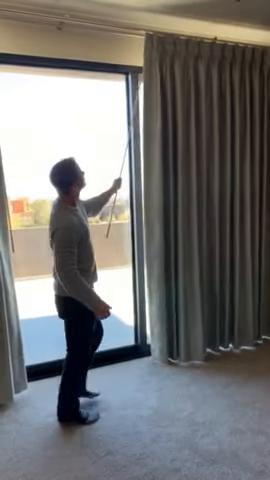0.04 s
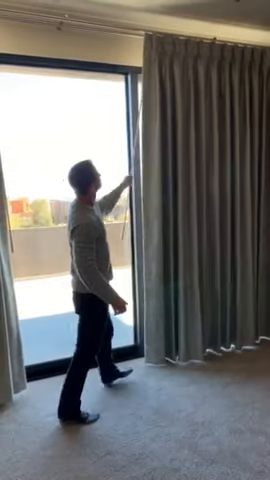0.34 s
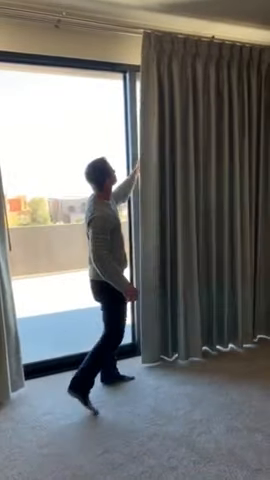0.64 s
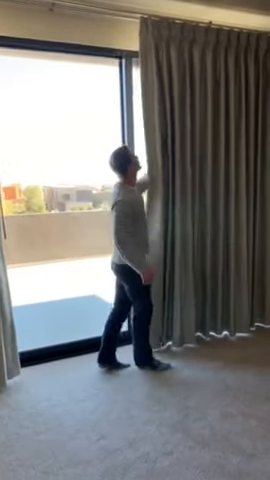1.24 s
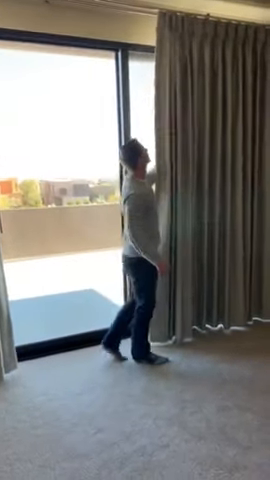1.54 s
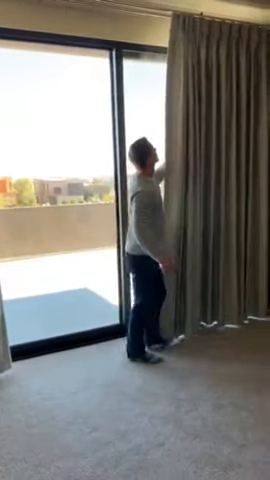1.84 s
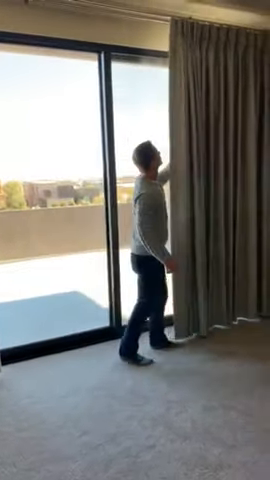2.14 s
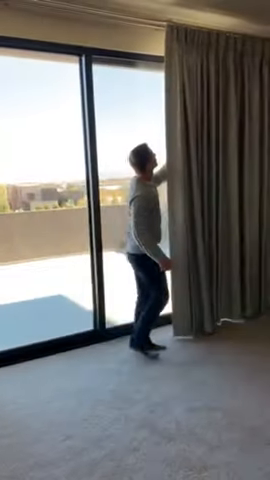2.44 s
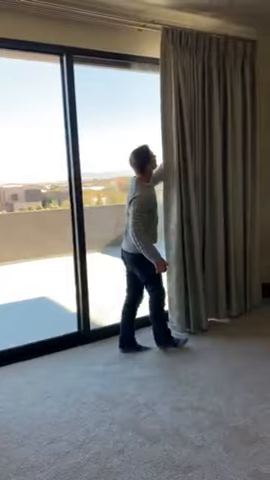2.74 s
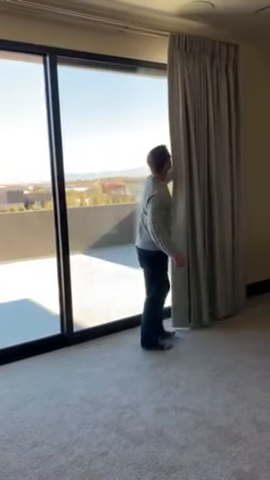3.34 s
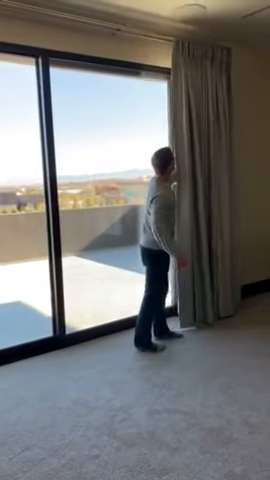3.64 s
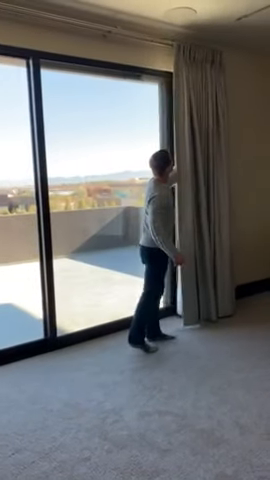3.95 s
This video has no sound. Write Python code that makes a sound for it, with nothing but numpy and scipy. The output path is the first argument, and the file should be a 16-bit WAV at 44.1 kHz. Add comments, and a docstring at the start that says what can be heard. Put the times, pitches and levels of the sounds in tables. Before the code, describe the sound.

A heavy drape slides open in a quiet room, heard from a few metres off. Faint footsteps come first, then a sharp tug rattles the rail, and the runners rub and rumble along while hooks chink and folds rustle.

```python
"""Drawing a heavy drape

A few metres away in a carpeted room, soft steps and the taps of a pull wand sound over a low hum.
The cloth stirs, then a tug shakes the ceiling track and the gliders (the little runners that carry
the drape) break loose with a rush. They slow down, then rub along steadily while the track rumbles.
Metal hooks chink, and the folds rustle as they gather."""
import sys
import numpy as np
from scipy import signal
from scipy.fft import rfft, irfft, next_fast_len
from scipy.io import wavfile
from scipy.ndimage import uniform_filter1d

SR = 44100
rng = np.random.default_rng(int(sys.argv[2]) if len(sys.argv) > 2 else 0)


def transcribe(u):
    """Save the signal u as a 16-bit wav file named by the first command-line argument.

    u: samples, shape (n,) or (channels, n), limited to [-1, 1]; the rate is SR.
    q: integer samples, one column per channel.
    """
    v = np.clip(np.atleast_2d(u).T, -1, 1)
    q = np.round(v * 32767).astype(np.int16)
    wavfile.write(sys.argv[1], SR, q)


N = 176400
TIME = np.arange(N) / SR

SLIPS_PER_S, SLIP_SPREAD_DB = 5000, 3
FIBRES_PER_S, FIBRE_SPREAD_DB = 20000, 2

# How loudly the gliders rub in the track. Each row: time in seconds, level in dB.
GLIDER_LEVEL = [(1.0, -100), (1.4, -72), (1.5, -56), (1.55, -42.5), (1.61, -41.5), (1.66, -48), (1.76, -54),
                (2.05, -63), (2.2, -57), (2.38, -53), (2.62, -53), (2.75, -50), (3.15, -50), (3.27, -52.5),
                (3.36, -49.5), (3.75, -49.5), (4, -50)]
# Their tone colour (how strong the lows and highs are). Each row: frequency in Hz, level in dB.
GLIDER_COLOUR = [(100, -10), (300, 0), (650, 1), (1100, -2), (2000, 0), (2700, 1), (4300, -2), (5600, -6),
                 (7600, -7), (9500, -12), (12500, -19), (15500, -26)]


def from_db(db):
    """Turn decibels into a number to multiply a sound by."""
    return 10 ** (np.asarray(db) / 20)


def rms_one(x):
    """Scale a signal so that its average strength (rms) is 1."""
    return x / np.sqrt(np.mean(x ** 2) + 1e-20)


def in_time(rows):
    """Join rows of seconds and dB into a volume curve."""
    return from_db(np.interp(TIME, *np.transpose(rows)))


def at_hz(points, hz):
    """Read between rows of Hz and dB, giving every octave the same space."""
    frequencies, levels = np.transpose(points)
    return np.interp(np.log(np.maximum(hz, 1)), np.log(frequencies), levels)


def coloured(x, colour):
    """Give a sound a tone colour; the result has strength 1."""
    gains = from_db(at_hz(colour, np.fft.rfftfreq(N, 1 / SR)))
    return rms_one(irfft(rfft(x) * gains, N))


def flutter(depth_db, rate_hz=45):
    """A volume curve that wavers at random, like an uneven sliding contact."""
    lowpass = signal.butter(2, rate_hz, fs=SR, output="sos")
    wobble = rms_one(signal.sosfilt(lowpass, rng.standard_normal(N)))
    return rms_one(from_db(depth_db * wobble))


def grains(per_s, spread_db):
    """Tiny impacts of uneven size at random moments."""
    sizes = from_db(spread_db * np.minimum(rng.exponential(1, N), 5))
    signs = rng.choice([-1, 1], N)
    return sizes * signs * (rng.random(N) < per_s / SR) + 1e-18


def resonate(x, modes):
    """Make a sound ring at an object's own notes (modes); narrow ones ring longer."""
    out = 0
    for k, (hz, width, db) in enumerate(modes):
        radius = np.exp(-np.pi * width / SR)
        angle = 2 * np.pi * min(hz / SR, .45)
        ring = signal.lfilter([1, 0, -1], [1, -2 * radius * np.cos(angle), radius * radius], x)
        out = out + (-1) ** k * from_db(db) * rms_one(ring)
    return rms_one(out)


def bursts(hits, decay_s):
    """A volume curve that jumps up at each hit and dies away."""
    return sum(from_db(db) * (TIME > s) * np.exp(-np.clip((TIME - s) / decay_s, 0, 20)) for s, db in hits)


def room_tone():
    """Ventilation makes a low rush of air, and the mains supply hums."""
    # Colour of the air noise. Each row: frequency in Hz, level in dB.
    colour = [(20, -44), (40, -5), (58, 8), (100, -6.5), (170, -11), (300, -22.5), (600, -31.5),
              (1500, -29), (3000, -34.5), (5000, -38), (10000, -34.5), (15500, -41.5)]
    air_db, hum_db, hum_hz = -65.5, -81.5, 63
    air = from_db(air_db) * coloured(rng.standard_normal(N), colour)
    return air + from_db(hum_db) * np.sqrt(2) * np.sin(2 * np.pi * hum_hz * TIME)


def steps():
    """A shoe lands with a dull thud and brushes the carpet."""
    # Steps and shuffles. Each row: start in seconds, thud in dB, scuff in dB, length in seconds.
    footfalls = [(.0, -78, -74.5, 0.035), (0.457, -73.5, -79, 0.065), (0.659, -74, -75.5, 0.091),
                 (0.895, -73, -74.5, 0.03), (1.188, -53, -58.5, 0.011), (1.233, -61.5, -91, 0.012)]
    # Colours of the thud and the scuff. Each row: frequency in Hz, level in dB.
    thud_colour = [(30, -18), (70, 3), (130, -1), (205, 9), (330, -2.5), (500, -16), (800, -16),
                   (1400, -34), (8000, -39)]
    scuff_colour = [(200, 10), (800, 4), (1500, 3.5), (2900, 3), (5000, -9), (7700, -6.5), (9500, -21),
                    (15000, -34)]
    attack_s, decay_s = 0.00056, 0.034
    thud = coloured(rng.standard_normal(N), thud_colour)
    scuff = coloured(rng.standard_normal(N), scuff_colour)
    out = 0
    for start, thud_db, scuff_db, length in footfalls:
        rise = np.clip((TIME - start) / attack_s, 0, 1)
        fall = np.exp(-np.clip((TIME - start - length) / decay_s, 0, 20))
        out = out + rise * fall * (from_db(thud_db) * thud + from_db(scuff_db) * scuff)
    return out


def wand():
    """The pull wand taps the top of the drape, and the rod rattles briefly."""
    # The taps. Each row: start in seconds, level in dB.
    taps = [(0.661, -67), (0.69, -73), (0.735, -80), (1.194, -54.5)]
    # The rod's notes. Each row: pitch in Hz, width in Hz, level in dB.
    modes = [(820, 110, -11), (1510, 400, -11), (2270, 340, 1), (2925, 82, 2), (3400, 200, -5),
             (4110, 260, -1.5), (6000, 500, -7), (7500, 690, -5)]
    return bursts(taps, decay_s=0.018) * resonate(rng.standard_normal(N), modes)


def cloth():
    """Countless fibres rub as the folds slide over each other."""
    # Loudness of the rubbing. Each row: time in seconds, level in dB.
    level = [(0, -100), (.97, -80.5), (1.15, -64), (1.21, -64.5), (1.28, -64), (1.42, -56), (1.52, -49.5),
             (1.6, -63), (1.72, -50.5), (1.88, -51.5), (2.07, -55), (2.18, -50), (2.4, -48.5), (2.8, -49),
             (3.3, -52), (3.8, -50), (4, -51)]
    # Its colour. Each row: frequency in Hz, level in dB.
    colour = [(150, -24), (500, -0.5), (1200, -0.5), (2000, 2), (2800, 1), (4200, 2.5), (5300, -7),
              (7700, -4.5), (9000, -27), (15000, -76)]
    return in_time(level) * flutter(depth_db=1.8) * coloured(grains(FIBRES_PER_S, FIBRE_SPREAD_DB), colour)


def carrier():
    """The lead carrier, which pulls the drape, takes up the load in hollow, ringing knocks."""
    # The knocks. Each row: start in seconds, level in dB, pitch in Hz, decay in seconds.
    knocks = [(1.191, -53, 800, .007), (1.528, -49, 575, .025), (1.572, -42, 932, .02),
              (1.59, -44, 568, .05)]
    attack_s = 0.0098
    out = 0
    for start, db, hz, decay_s in knocks:
        age = np.clip(TIME - start, 0, 1)
        shape = 2 * (1 - np.exp(-age / attack_s)) * np.exp(-age / decay_s)
        out = out + from_db(db) * shape * np.sin(2 * np.pi * hz * age)
    return out


def clatter():
    """The wand's rod gives one sharp tick, then gliders clack together as the slack is taken up; each clack is
    a spray of tiny hard contacts."""
    # The clacks. Each row: start in seconds, level in dB.
    clacks = [(1.194, -61), (1.521, -49), (1.535, -48), (1.556, -41), (1.587, -42)]
    # Their colour. Each row: frequency in Hz, level in dB.
    colour = [(1000, -12), (3000, -1), (5500, -1), (7500, -2), (10000, -5), (12500, -13), (15000, -10)]
    return bursts(clacks, decay_s=.014) * coloured(grains(SLIPS_PER_S, SLIP_SPREAD_DB), colour)


def track():
    """The drape's weight bumps along and shakes track and ceiling, harder where a glider catches."""
    # Loudness of the rumble. Each row: time in seconds, level in dB.
    level = [(0, -110), (1.0, -80.5), (1.38, -77), (1.46, -59.5), (1.51, -44), (1.62, -48.5), (1.75, -49.5),
             (1.9, -50), (2.06, -57.5), (2.17, -52.5), (2.32, -52.5), (2.45, -49.5), (2.8, -56.5),
             (3.25, -53), (3.7, -53.5), (4, -52)]
    # Low notes of track and ceiling. Each row: pitch in Hz, width in Hz, level in dB.
    modes = [(72.3, 12, -9.5), (129, 18, -10.5), (178.4, 17.7, -2), (209.6, 13, 3.5), (228, 29, -2),
             (265, 16, -3.5), (305.7, 10, -9), (352, 9.5, -4.5), (397, 16, -10.5), (448, 15, -10.5),
             (585, 16, -16)]
    # Moments when a glider catches. Each row: time in seconds, extra rumble in dB.
    catches = [(1.772, 4), (1.842, 4), (1.974, 5), (2.155, 4), (3.099, 4), (3.70, 4)]
    catch_width_s, cutoff_hz = .016, 900
    shake = resonate(grains(per_s=830, spread_db=-1.5), modes)
    shake = signal.sosfilt(signal.butter(2, cutoff_hz, fs=SR, output="sos"), shake)
    even_shake = shake / np.sqrt(uniform_filter1d(shake ** 2, size=3000) + 1e-9)
    thumps_db = sum(db * np.exp(-((TIME - s) / catch_width_s) ** 2) for s, db in catches)
    return in_time(level) * from_db(thumps_db) * even_shake


def judder():
    """The tugged track shudders in one rough, low note that sags as the drape starts to move."""
    # The path of the note. Each row: time in seconds, level in dB, pitch in Hz.
    note = [(1.41, -75, 215), (1.475, -57, 215), (1.505, -44.5, 200), (1.53, -46, 198), (1.565, -42, 203),
            (1.61, -46, 188), (1.64, -41, 178), (1.67, -48, 182), (1.70, -43.5, 186), (1.75, -59, 195),
            (1.85, -100, 200)]
    times, db, hz = np.transpose(note)
    phase = 2 * np.pi * np.cumsum(np.interp(TIME, times, hz)) / SR
    volume = from_db(np.interp(TIME, times, db)) * (TIME > times[0])
    return volume * flutter(depth_db=2.5) * np.sqrt(2) * np.sin(phase)


def hooks():
    """Each chink is a few milliseconds of metal chattering on metal, then a faint loose rattle."""
    # The chinks. Each row: start in seconds, level in dB, length in seconds, pitch in Hz.
    chinks = [(1.446, -60.5, .008, 11500), (1.499, -40.5, 0.0024, 10480), (1.522, -52, 0.007, 7500),
              (1.553, -40, 0.007, 7800), (1.586, -42, 0.0046, 7700), (2.33, -44, .006, 7350),
              (2.3543, -43, 0.01, 7850), (2.362, -37, 0.0045, 7600), (2.361, -45, .007, 14650),
              (2.378, -46.5, .009, 11930), (2.422, -47, .005, 7800), (2.4555, -44, 0.0058, 7600),
              (2.463, -43.5, .004, 7400), (2.516, -51, .004, 7950), (2.5536, -42, 0.0034, 7580)]
    # A hook's notes. Each row: multiple of its pitch, width in Hz, level in dB.
    modes = [(.93, 300, -3), (1.0, 200, 0), (1.12, 1500, -12), (1.89, 600, -18)]
    contacts_per_s, chatter_decay_s = 4000, .003
    rattle_db, rattle_decay_s = -13, 0.037
    out, t = np.zeros(N + SR), TIME[:SR // 10]
    rattle = from_db(rattle_db) * np.exp(-t / rattle_decay_s)
    for start, db, length, hz in chinks:
        contacts = rng.standard_normal(len(t)) * (rng.random(len(t)) < contacts_per_s / SR) + 1e-18
        chatter = np.exp(-np.maximum(t - length, 0) / chatter_decay_s)
        tuned_modes = [(ratio * hz, width, level) for ratio, width, level in modes]
        ring = resonate(contacts * (chatter + rattle), tuned_modes)
        ring *= np.sqrt((length + chatter_decay_s) / t[-1])   # strength near 1 during the chatter
        first = int(start * SR)
        out[first:first + len(t)] += from_db(db) * ring
    return out[:N]


def gliders():
    """The gliders stick and slip, making the hollow rail ring and adding a dry, high squeak."""
    # Notes of the rail and of the squeak. Each row: pitch in Hz, width in Hz, level in dB.
    rail_modes = [(351, 26, -3), (454, 34, -9.5), (662, 81, -3), (844, 34, -0.5), (1173, 26, -1.5),
                  (1610, 8.3, -16), (1975, 18, 2.5), (2340, 87, -8), (2750, 144, 9), (2960, 9.2, -19),
                  (3310, 20, -15), (3490, 28, 1), (4200, 82, 8), (4800, 18, -1)]
    squeak_modes = [(5950, 680, -3), (6900, 250, 1.5), (7500, 69, 0), (7980, 210, -4), (8460, 52, -1),
                    (9900, 1800, -7.5)]
    rail_db, squeak_db = -0.5, -9.5   # compared with the rubbing
    swell_hz = 11
    rubbing = coloured(grains(SLIPS_PER_S, SLIP_SPREAD_DB), GLIDER_COLOUR)
    slips = grains(SLIPS_PER_S, SLIP_SPREAD_DB)
    ringing = 0
    for hz, width, db in rail_modes:
        swell = flutter(depth_db=3.5, rate_hz=swell_hz)   # each note comes and goes on its own
        ringing = ringing + from_db(db) * swell * resonate(slips, [(hz, width, 0)])
    squeak = flutter(depth_db=4, rate_hz=swell_hz) * resonate(slips, squeak_modes)
    sliding = rubbing + from_db(rail_db) * rms_one(ringing) + from_db(squeak_db) * squeak
    return in_time(GLIDER_LEVEL) * flutter(depth_db=1.6) * sliding


def ticks():
    """Single gliders tap the rail at random, harder when the sliding is louder."""
    tick_db = -12   # compared with the rubbing
    taps = coloured(grains(per_s=22, spread_db=2.5), GLIDER_COLOUR)
    return from_db(tick_db) * in_time(GLIDER_LEVEL) * taps


def jolt():
    """The gliders knock against the rail and each other as they break loose; the lead carrier rings."""
    # Colour of the knocking. Each row: frequency in Hz, level in dB.
    colour = [(150, -22), (400, -6), (590, -1), (800, -4), (1100, 0), (1600, -3), (3000, -5), (5500, -6),
              (8000, -12), (11000, -16), (15000, -23)]
    # The carrier's notes. Each row: pitch in Hz, width in Hz, level in dB.
    carrier_modes = [(553, 24, 0), (675, 44, -4), (800, 56, -17), (926, 25, -13), (1160, 150, -9),
                     (1486, 56, -7), (1670, 19, -5)]
    peak_s, attack_s, hold_s, decay_s = 1.547, 0.021, 0.017, 0.12
    knocks_per_s, spread_db = 2600, 1.5
    jolt_db, ring_db = -47, -0.5   # the ring is compared with the knocks
    rise = (TIME - peak_s) / attack_s
    fall = (peak_s + hold_s - TIME) / decay_s
    swell = np.exp(np.clip(np.minimum(rise, fall), -20, 0))
    knocks = coloured(grains(knocks_per_s, spread_db), colour)
    ringing = from_db(ring_db) * resonate(grains(knocks_per_s, spread_db), carrier_modes)
    return from_db(jolt_db) * swell * (knocks + ringing)


def bunching():
    """Folds press together and rustle as the drape gathers at the end of the track."""
    # Loudness of the rustle. Each row: time in seconds, level in dB.
    level = [(1.0, -100), (2.3, -76), (3.0, -60), (3.6, -53.5), (3.76, -49), (3.88, -47), (4, -53.5)]
    # Its colour. Each row: frequency in Hz, level in dB.
    colour = [(800, -13), (1700, -12), (2200, 0.5), (2750, 2.5), (3200, -4), (4000, -5), (8000, -50)]
    return in_time(level) * coloured(grains(FIBRES_PER_S, FIBRE_SPREAD_DB), colour)


def room(x, echo_db=0):
    """Sound reaches the left side first, and each side gets its own short wash of echoes."""
    # Echoes compared with the direct sound. Each row: frequency in Hz, level in dB.
    echo_colour = [(100, -20), (220, -17.5), (550, 5.5), (1500, -2.5), (3500, 5.5), (6000, -3.5),
                   (8000, -25), (15000, -58)]
    # Left-right balance. Each row: frequency in Hz, left minus right in dB.
    balance = [(60, 2.2), (200, -2.8), (500, -4.5), (1000, -1.4), (2000, 0.9), (4000, 0), (12000, 0)]
    fade_s, right_lag_s = 0.22, 0.00012   # the echoes fall by 60 dB in fade_s
    size = next_fast_len(N + SR // 2)
    hz, t = np.fft.rfftfreq(size, 1 / SR), TIME[:SR // 2]
    tails = rng.standard_normal((2, len(t))) * np.exp(-np.log(1000) * t / fade_s)
    tails /= np.sqrt(np.sum(tails ** 2, axis=1, keepdims=True))
    direct = np.exp(-2j * np.pi * hz * right_lag_s * np.array([[0], [1]]))
    echo_gain = from_db(at_hz(echo_colour, hz) + echo_db)
    response = (direct + echo_gain * rfft(tails, size)) / np.sqrt(1 + echo_gain ** 2)
    pan = from_db(at_hz(balance, hz) * np.array([[.5], [-.5]]))
    return irfft(rfft(x, size) * pan * response, size)[:, :N]


def scene():
    """All the sounds together; the drape is heard from several places, each with its own echoes."""
    places = 3
    drape = sum(room(cloth() + gliders() + ticks() + jolt() + bunching()) for _ in range(places))
    low_sounds = room(track() + judder() + steps() + room_tone())
    knocks = room(carrier(), echo_db=-8)
    chinks_and_taps = room(hooks() + wand(), echo_db=-1)
    return drape / np.sqrt(places) + low_sounds + knocks + chinks_and_taps


def record(dry):
    """A steep filter cuts off the very highest treble."""
    cutoff_hz = 15700
    return signal.sosfilt(signal.ellip(10, .2, 80, cutoff_hz, fs=SR, output="sos"), dry)


dry = scene()
out = record(dry)
transcribe(out)
```